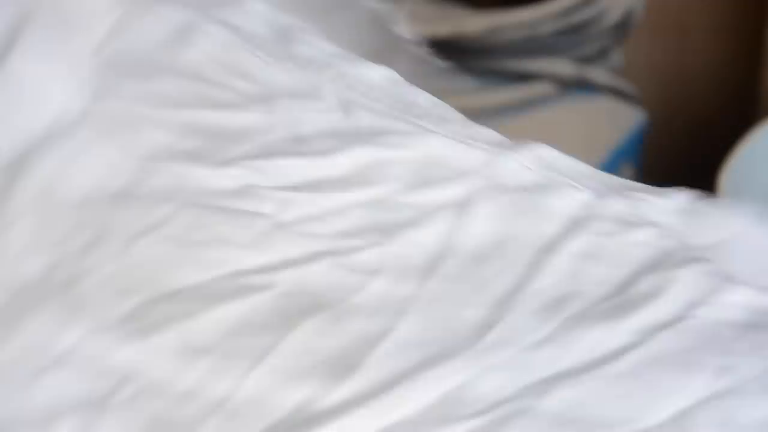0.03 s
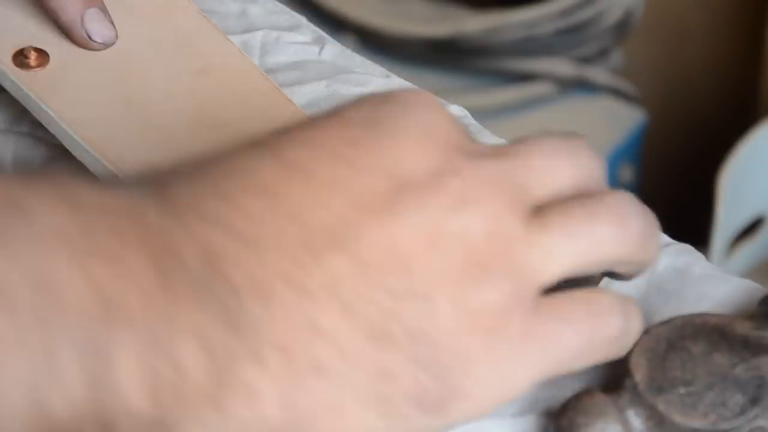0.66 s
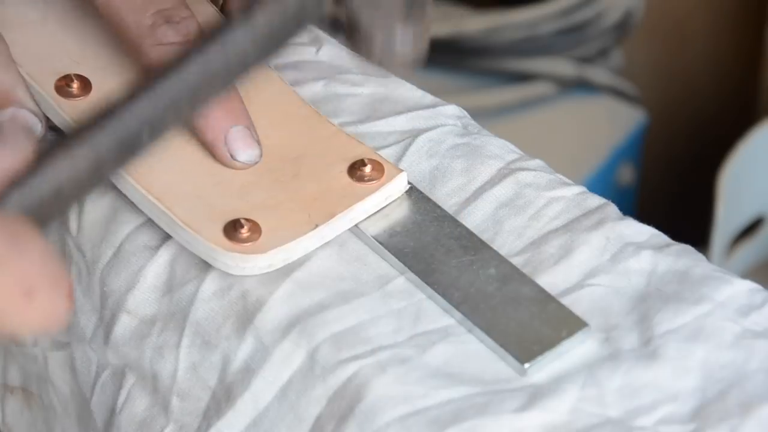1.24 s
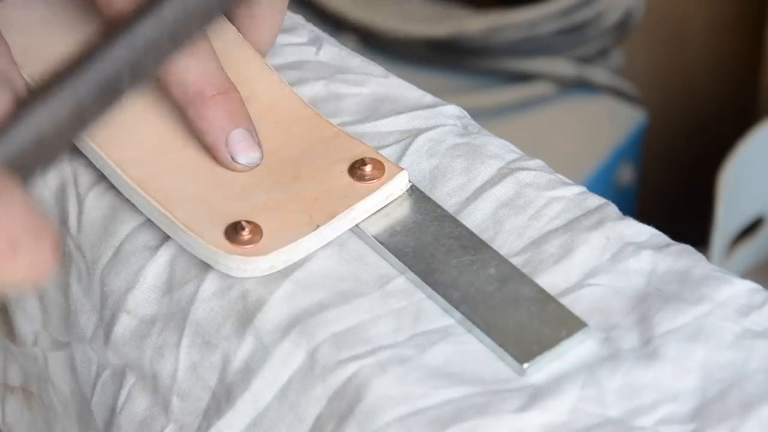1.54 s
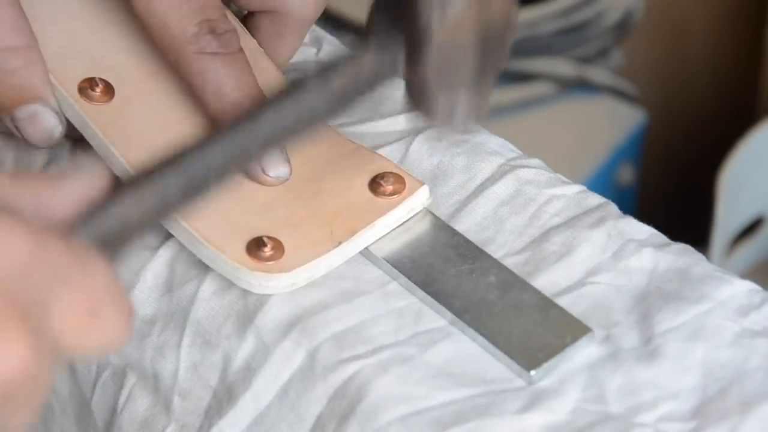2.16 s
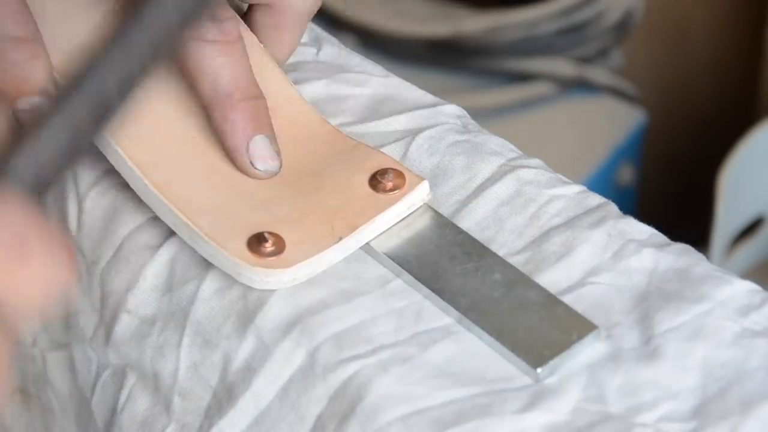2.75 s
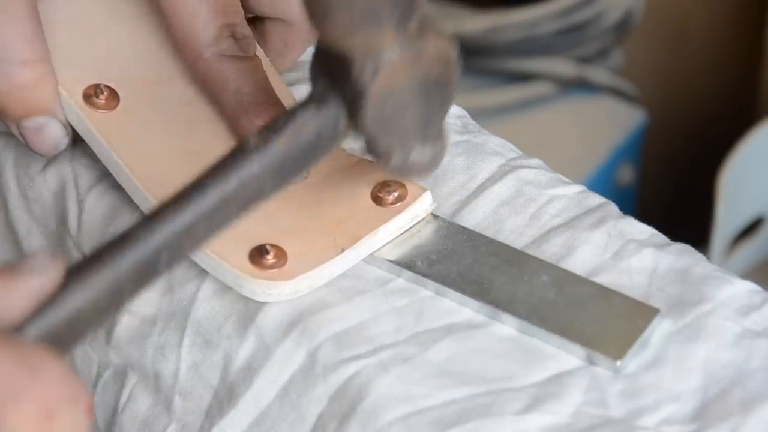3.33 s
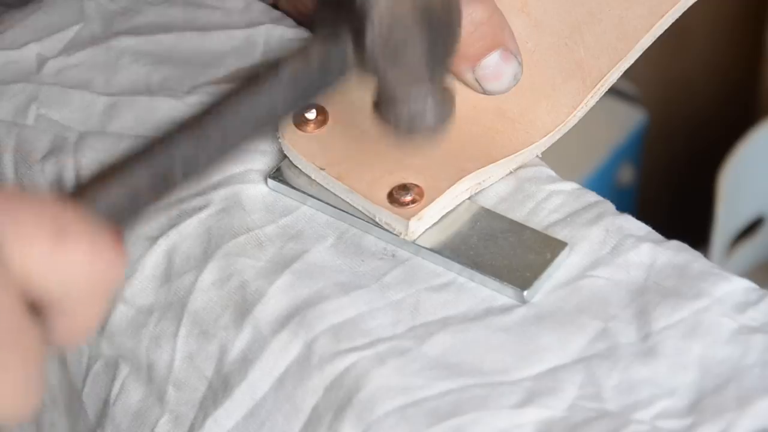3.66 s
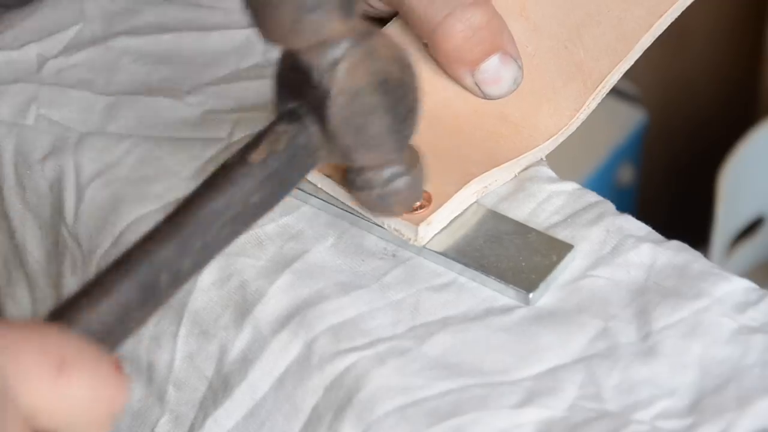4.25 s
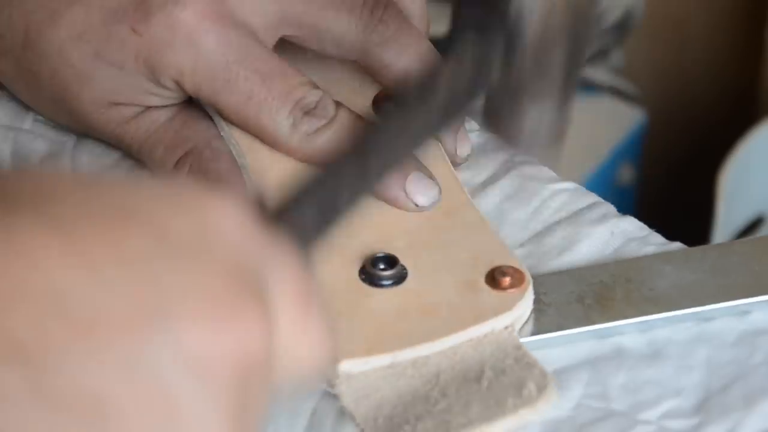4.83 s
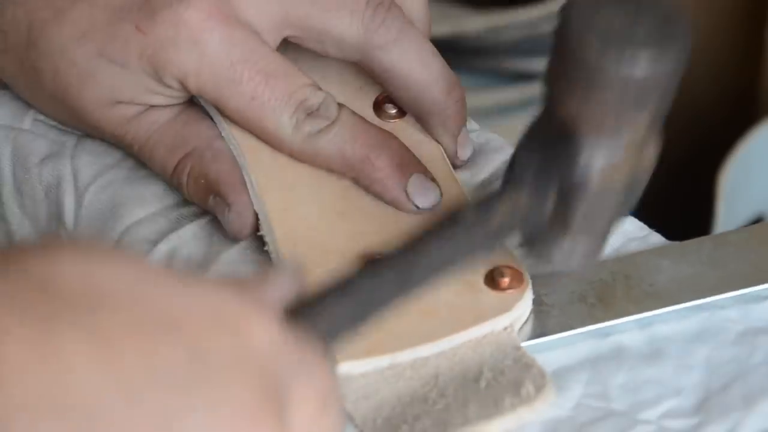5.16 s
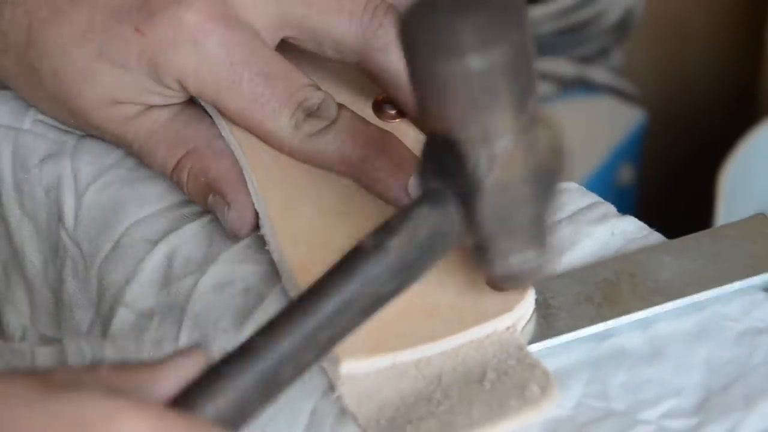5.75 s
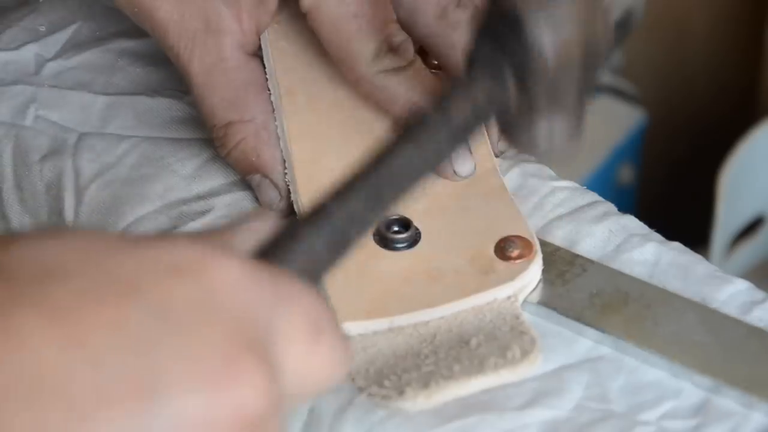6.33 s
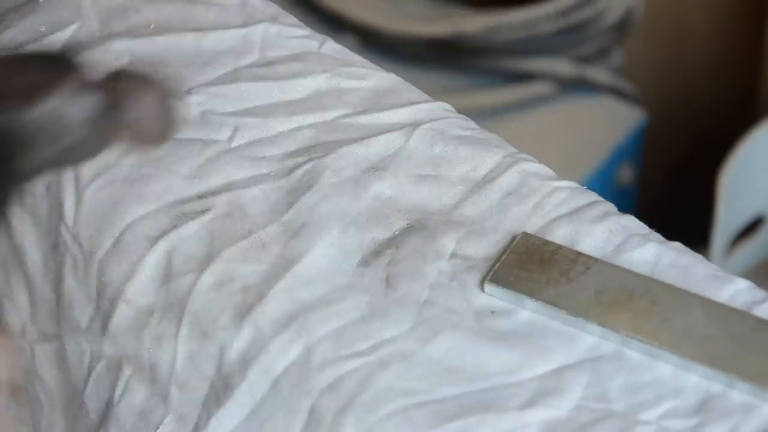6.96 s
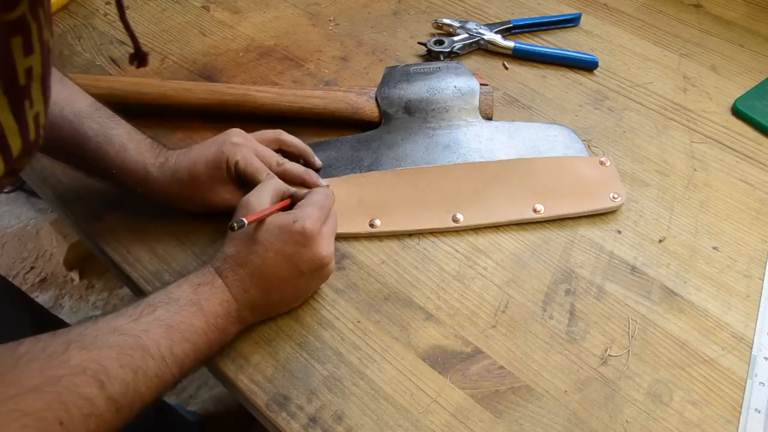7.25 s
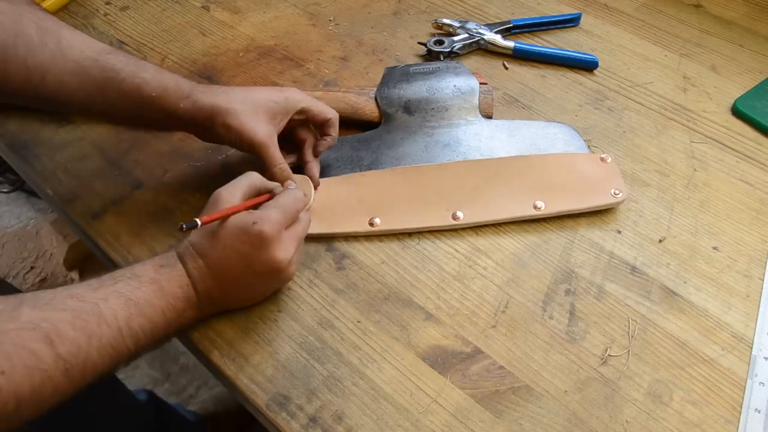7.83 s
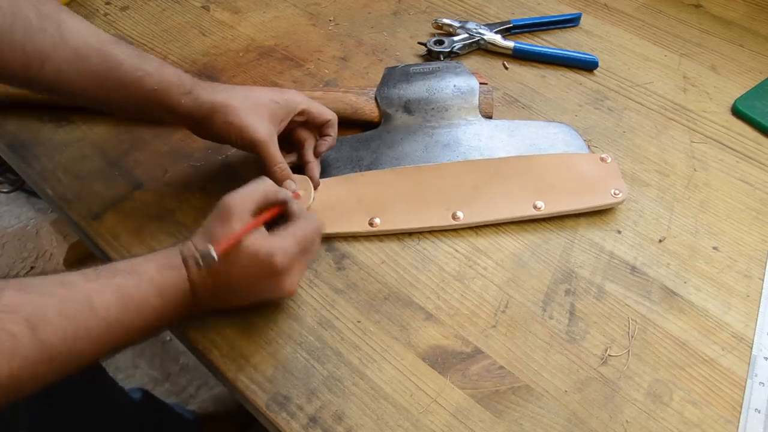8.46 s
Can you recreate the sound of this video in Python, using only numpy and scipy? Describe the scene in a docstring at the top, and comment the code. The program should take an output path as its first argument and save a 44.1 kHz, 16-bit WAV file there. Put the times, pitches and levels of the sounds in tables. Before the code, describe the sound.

In a quiet small workshop, cloth rustles and a steel bar clinks down and slides into place. A small hammer then taps rivets into a leather strap about seventy times in quick succession, each a sharp crack with a bench thud and a brief metal ring. The hammer is laid down with a clunk and a pencil stutters faintly across the leather. The microphone is close.

```python
"""A small hammer sets copper rivets in a leather strap on a steel bar: some seventy quick taps, each
a crack, a thud of the bench and a brief ring of metal, many blurred by a short rush just ahead.
One microphone stands close to the cloth-covered bench in a small workshop, over quiet air and hum.
First the bar clinks down and slides into place on the cloth; at the end the hammer is laid down
and a pencil stutters across the leather."""
import sys
import numpy as np
from scipy import signal
from scipy.fft import rfft, irfft
from scipy.io import wavfile

SR = 44100
rng = np.random.default_rng(int(sys.argv[2]) if len(sys.argv) > 2 else 0)


def file_out(sig):
    """Save sig as 16-bit WAV at sys.argv[1]."""
    # one column per channel
    cols = np.atleast_2d(sig).T
    # limit, then scale
    lim = np.clip(cols, -1, 1)
    pcm = np.round(lim * 32767).astype(np.int16)
    wavfile.write(sys.argv[1], SR, pcm)


N = 374850
TIME = np.arange(N) / SR
HIT_SAMPLES = 12288

# spectrum of the room air: frequency_hz, density_db
AIR_SPECTRUM = [(20, -14.5), (60, 1.5), (110, -6.5), (200, -6), (290, -2), (380, -8.5), (850, -7.5),
                (2000, -15.5), (4000, -20.5), (5600, -27), (6200, -26), (6800, -27), (9000, -31.5),
                (16000, -44)]
# loudness of the room air: time_s, level_db
AIR_LEVELS = [(0, -61.5), (7.28, -60), (7.3, -64), (8.5, -64)]
# electric hum and whine: pitch_hz, rms_db
HUM_TONES = [(61.5, -76), (102, -77), (150.5, -75), (301.3, -68.5), (15735, -80)]
# spectrum of rustling cloth and leather: frequency_hz, density_db
RUSTLE_SPECTRUM = [(100, -34), (500, 3), (1200, -4.5), (2500, -3), (5000, -2), (5700, -12), (7500, -7),
                   (10000, -7.5), (13000, -24), (16000, -39)]
# cloth and leather brushing: start_s, length_s, level_db, fade_db_per_s
BRUSH_STROKES = [(0, 0.017, -54, 200), (0.081, 0.23, -55, 52), (1.02, 0.11, -68.5, 36),
                 (6.858, 0.43, -61.5, 10), (7.728, .03, -64, 50), (7.827, 0.072, -61.5, 30)]
# short pushes of the bar over the cloth: start_s, length_s, level_db, from_hz, to_hz
BAR_PUSHES = [(0.64, .05, -63, 3400, 3750), (.65, 0.096, -63, 4500, 4800),
              (0.687, 0.059, -57.5, 2900, 2400), (0.71, .08, -59, 3400, 3530),
              (0.999, 0.069, -53.5, 4330, 4550), (1.04, 0.17, -63, 4440, 4250)]
# light knocks of fingers, strap and tools: start_s, level_db, pitch_hz, t60_s
LIGHT_KNOCKS = [(0.074, -46.5, 2520, 0.1), (1.118, -58, 4180, .08), (1.164, -43.5, 2390, 0.084),
                (1.167, -52, 7700, .06), (6.975, -49.5, 4020, 0.057), (7.095, -34.5, 242, 0.22),
                (7.151, -31.5, 2320, 0.025), (7.244, -38.5, 3950, 0.011), (7.786, -52, 170, 0.064)]
# the bar touches down on the strap's edge: start_s, level_db
BAR_TOUCHES = [(.5915, -29), (.594, -52), (.634, -32.5)]
# modes of the bar held in the fingers: pitch_hz, level_db, t60_s
HELD_BAR_MODES = [(330, -15.5, 0.044), (2400, -8.5, 0.018), (2860, -4.5, 0.047), (2730, -3, 0.074),
                  (5900, -25, 0.05)]
# the hammer is laid down and rocks: start_s, level_db
HAMMER_TOUCHES = [(7.0915, -21.5), (7.0985, -21.5), (7.111, -32)]
# modes of the lying hammer: pitch_hz, level_db, t60_s
LYING_HAMMER_MODES = [(264, -13, .11), (1230, -24, .12), (2342, 2, .1), (2480, 0, .05), (2640, -6, .05),
                      (2826, -9, .05), (4027, -3, .045), (5044, -5, .06)]
# resonances and hollows of bench, hammer and bar: centre_hz, width_hz, gain_db
BODY_RESONANCES = [(165, 20, -2.5), (187, 30, 3.5), (228, 25, -3), (262, 25, 1), (300, 25, -3),
                   (365, 50, 2), (470, 45, 4), (535, 30, -4), (590, 35, 4), (645, 60, -2), (720, 90, -5),
                   (885, 50, 3), (1000, 110, 3.5), (1421, 45, 6), (1631, 45, 5), (1903, 90, 5),
                   (2060, 45, 4), (2216, 45, 2), (2333, 40, 6.5), (2588, 60, 3), (2940, 130, 4.5),
                   (4300, 500, 1.5), (3400, 600, -2.5), (3585, 45, 5), (4742, 35, 7), (5150, 400, -2.5),
                   (5690, 240, -11), (6200, 500, 4), (6900, 200, -7), (7750, 300, 2), (8200, 2600, 4),
                   (10437, 35, 10), (12030, 140, 6), (13000, 2500, -2.5)]
# long, thin tones of the steel bar, their levels relative to the snap: pitch_hz, level_db, t60_s
BAR_TONES = [(4742, -3, .15), (5950, -11, .22), (7220, -7, .3), (9098, -8, .28), (10850, -19, .18),
             (11630, -13, .24)]
# the six noise bands of a usual blow (thud, knock, clack, ping, snap, fizz):
# low_hz, high_hz, tail_t60_s, crack_t60_s, crack_weight_db, level_db
BLOW_BANDS = [(140, 630, 0.15, 0.02, -1.5, -34.5), (694, 1452, 0.094, 0.013, 4.5, -36.5),
              (1700, 6010, 0.11, 0.009, 5.5, -27.5), (7370, 8050, 0.065, 0.0043, 9, -35),
              (5000, 9900, 0.11, 0.0077, 9.5, -36.5), (10660, 14000, .055, 0.0034, 11, -45)]
# a harder blow is brighter; each band's growth with strength: gain_db_per_db
BAND_GROWTH = [0.68, 1.2, 1.08, 0.92, 1.6, 1.4]
# each shift seats the strap differently on the bar, changing bench coupling, firmness and ring:
# start_s, thud_hz, bench_db, firmness_db, head_ring_db, bar_ring_db, best_ring_hz
STRAP_SEATS = [(1.2, 480, -1.5, -3.5, -26, -15, 7410), (1.62, 410, 0, 4, -13.5, -4, 6300),
               (2.0, 370.5, 0, -1.5, -26.5, -4, 6900), (2.87, 375, 1.5, 3, -20, -6.5, 6240),
               (3.68, 432, -1.5, -3, -23, -11.5, 8300), (4.65, 476, 0, 1.5, -15, -6, 9100),
               (5.99, 465, -1, 2.4, -18, -18.5, 9100), (6.68, 485, .5, 5, -8, -11.5, 8000)]
# hammer blows, all levels relative: start_s, strength_db, crack_db, rush_db, ping_db, clack_hz
HAMMER_BLOWS = [(1.2506, -41, 25.5, -7, -15, 2150), (1.3488, -41, 23.5, 8.5, -20, 1890),
                (1.4516, -36.5, 20, 4.5, -1, 1900), (1.5517, -37.5, 17.5, 8.5, -15, 2120),
                (1.6409, -34, 23, -5, 5, 2430), (1.7255, -39.5, 16, 9, 10.5, 2980),
                (1.7898, -35, 20, -4, 14, 2450), (1.853, -38.5, -8.5, -29, 4.5, 2860.0),
                (1.944, -39, 5, 15, 9.5, 2780), (2.0388, -33.5, 17, 1.0, 0.5, 3460),
                (2.115, -35.0, 1, -30.0, -21, 3420), (2.214, -32, 16.5, -4.5, -6, 3470),
                (2.3048, -35, 18, -0.5, -3, 3520), (2.3927, -33.5, 16.5, -4.5, -0.5, 3280),
                (2.4852, -34.5, 18, 1.5, 0.5, 3450), (2.579, -35.5, -5, 14, -12.5, 3340),
                (2.6609, -32.5, 16.5, -3.5, 3, 3560.0), (2.7464, -34, -1, -31, 0, 3220),
                (2.8454, -32, 18, -8, -2.5, 3380), (2.892, -38, 15.5, -7, -8, 2970),
                (2.9648, -36.5, 7.5, -27, -3, 2780.0), (3.0449, -35.5, 5, -42, -13, 2760),
                (3.1297, -37, -9, -35, -16, 2760), (3.2283, -38.5, 16.5, 13.0, -4, 2090.0),
                (3.31, -38, 15.5, 12, -15, 2800), (3.391, -35.0, 18.5, 1.5, -15.0, 2640),
                (3.479, -38, 16, 12, -2, 3030), (3.5529, -32.5, 20, -17, -14.5, 2700),
                (3.6337, -36, 14.5, -22, 4.5, 2750), (3.7236, -35, 17, 12.5, -5, 2150),
                (3.8038, -36, 16.5, 12, -10, 2060), (3.881, -32, 11, -57, -2.5, 2160),
                (3.9741, -31, 18.5, -5, -4.5, 2200.0), (4.0567, -31.5, 8.5, -34, 0.0, 2470.0),
                (4.1452, -30.5, 15, -35, 3, 2350), (4.2288, -34.5, 5.5, -30.0, -0.5, 2260),
                (4.3164, -34, 19.5, -1.0, -15, 1830), (4.3923, -33.0, 11, -16, 1.5, 2240),
                (4.4665, -33.0, 11, -42, 2, 2090), (4.541, -34.5, 17.5, -32.5, -7.5, 2020),
                (4.6802, -38.5, 20.5, 1.5, -3, 1570), (4.772, -36.0, 19.5, 10.5, 3.5, 2600),
                (4.8391, -35.0, 9, -34, 9, 2730), (4.914, -34.5, 15, -32, 0.5, 2260),
                (4.9968, -38.5, 17.5, 12, -13, 2530), (5.0714, -33.5, 21, 0.5, 7.5, 2500),
                (5.1428, -33, 15.5, -4.5, 5, 2500), (5.22, -36.0, 17.5, 4.5, -21, 2230),
                (5.293, -32, 18.5, -4.5, -2, 2480), (5.3703, -29.5, 21.5, -9.5, -1.5, 2580),
                (5.4516, -36.0, 17, 11.5, 3.5, 2550), (5.5188, -35.5, 11.5, -18, 5.5, 2600.0),
                (5.6007, -32, 23.5, -2.5, 3.5, 2160), (5.6778, -35.0, 13.5, -2, 3.5, 2300),
                (5.762, -37.5, 7, 14.5, 5, 2700), (5.8318, -35.5, 16.5, 9, -3.5, 2270.0),
                (5.9332, -30.5, 18, -7, -4, 2020), (5.963, -40.5, 24, -13.5, 1.5, 2520.0),
                (6.0219, -32, 18, -33, -4.5, 2860.0), (6.101, -37.0, 22, 7.5, -5.5, 2500),
                (6.1643, -31.5, 21, -10, -7, 2600), (6.232, -35.5, 18.5, -17, -14.0, 2600),
                (6.3045, -36, 21, -1, -1, 2600.0), (6.379, -38, 4, 18, -23, 2770),
                (6.4424, -34, 18.5, -2.5, -4, 2600), (6.509, -33, 19, -4.5, -8, 2570),
                (6.5733, -36, 21.5, -6, -21, 2700), (6.651, -42.0, 11.5, 19.5, -8.0, 2740.0),
                (6.7128, -30.5, 24, -6.5, -22, 2630), (6.7929, -34.5, 16.5, -1.5, -9, 2560)]


def from_db(db):
    """Decibels to gain."""
    return 10 ** (np.asarray(db) / 20)


def unit_rms(x):
    """Scale to an rms of 1."""
    return x / np.sqrt(np.mean(x ** 2) + 1e-20)


def add(out, start_s, sound):
    """Mix a sound in at start_s."""
    at = round(start_s * SR)
    out[at:at + len(sound)] += sound[:N - at]


def decay(t, t60):
    """Exponential decay from t = 0, silent before."""
    return (t >= 0) * from_db(-60 * np.maximum(t, 0) / t60)


def band(low_hz, high_hz, order=2):
    """Butterworth band-pass sections."""
    return signal.butter(order, [low_hz, high_hz], "band", fs=SR, output="sos")


def resonance(f, hz, width_hz, db):
    """Causal response of one resonance (db > 0) or hollow (db < 0), flat far from it."""
    detune, damping = hz ** 2 - f ** 2, 1j * f * width_hz
    return (detune + damping * from_db(max(db, 0))) / (detune + damping * from_db(max(-db, 0)))


def coloured_noise(spectrum):
    """Steady noise of a given spectrum, rms 1."""
    hz, db = np.transpose(spectrum)
    f = np.maximum(np.fft.rfftfreq(N, 1 / SR), 1)
    colour = from_db(np.interp(np.log(f), np.log(hz), db))
    return unit_rms(irfft(rfft(rng.standard_normal(N)) * colour, N))


def flutter(per_s, depth_db):
    """A gain that wanders at random."""
    knots = np.arange(0, TIME[-1] + 1, 1 / per_s)
    return from_db(depth_db * np.interp(TIME, knots, rng.standard_normal(len(knots))))


def room_tone():
    """The workshop behind the bench: quiet air and a steady electric hum."""
    hum = sum(from_db(db) * np.sqrt(2) * np.sin(2 * np.pi * (hz * TIME + rng.random()))
              for hz, db in HUM_TONES)
    air_db = np.interp(TIME, *np.transpose(AIR_LEVELS))
    return hum + from_db(air_db) * coloured_noise(AIR_SPECTRUM)


def cloth_rustle(attack_s=.015, release_t60=.12):
    """Cloth and leather brush in brief strokes of flickering noise."""
    strokes = 0
    for start_s, length_s, db, fade_db_per_s in BRUSH_STROKES:
        t = TIME - start_s
        attack = np.clip(1 + t / attack_s, 0, 1)
        level = from_db(db - fade_db_per_s * np.clip(t, 0, length_s))
        release = decay(np.maximum(t - length_s, 0), release_t60)
        strokes += attack * level * release
    return strokes * coloured_noise(RUSTLE_SPECTRUM) * flutter(per_s=83, depth_db=2.5)


def bar_slides(width_hz=150):
    """The bar slides over the weave with a breathy whistle that glides with its speed."""
    out = np.zeros(N)
    lowpass = signal.butter(2, width_hz, fs=SR, output="sos")
    for start_s, length_s, db, from_hz, to_hz in BAR_PUSHES:
        hz = np.linspace(from_hz, to_hz, round(length_s * SR))
        weave = unit_rms(signal.sosfilt(lowpass, rng.standard_normal(len(hz))))
        whistle = weave * np.sin(2 * np.pi * np.cumsum(hz) / SR)
        add(out, start_s, from_db(db) * np.hanning(len(hz)) * whistle)
    return out


def knocks_and_pencil(pencil_s=7.622, step_s=.0175, pencil_db=-51, pencil_hz=1490, pencil_t60=.048):
    """Damped contacts, each a noise burst around one pitch; the pencil stutters in an even run of six."""
    out, t = np.zeros(N), np.arange(HIT_SAMPLES) / SR
    pencil = [(pencil_s + k * step_s, pencil_db + rng.normal(0, 2), pencil_hz, pencil_t60)
              for k in range(6)]
    for start_s, db, hz, t60 in LIGHT_KNOCKS + pencil:
        burst = signal.sosfilt(band(hz / 1.65, hz * 1.3, order=1), rng.standard_normal(HIT_SAMPLES))
        add(out, start_s, from_db(db) * unit_rms(burst) * decay(t, t60))
    return signal.sosfilt(band(159.5, 7900), out + 1e-18)


def tool_set_down(touches, modes, scuff_db, scuff_t60):
    """Each touch rings a tool's modes over a short scuff; the cloth softens the contact."""
    out, t = np.zeros(N), np.arange(HIT_SAMPLES) / SR
    for start_s, level_db in touches:
        ring = 0
        for hz, db, t60 in modes:
            gain = from_db(db + rng.normal(0, 1))
            ring += gain * np.sin(2 * np.pi * (hz * t + rng.random())) * decay(t, t60)
        scuff = from_db(scuff_db) * rng.standard_normal(HIT_SAMPLES) * decay(t, scuff_t60)
        add(out, start_s, from_db(level_db) * (ring + scuff))
    return signal.sosfilt(band(190, 5400, order=6), out + 1e-18)


def steel_ring(t, bar_db, best_hz, head_db, head_hz=2338, head_t60=.25, loss_db_per_octave=16):
    """Bar and hammer head sing on after a blow; bar tones weaken with their distance from best_hz."""
    tones = [(hz, bar_db + db - loss_db_per_octave * abs(np.log2(hz / best_hz)), t60)
             for hz, db, t60 in BAR_TONES]
    tones.append((head_hz, head_db, head_t60))
    return sum(from_db(db + rng.normal(-1, 2.5)) * np.sin(2 * np.pi * hz * t) * decay(t, t60)
               for hz, db, t60 in tones)


def blow_envelope(t, crack_db, rush_db, tail_t60, crack_t60, echo_s=.0067, rush_s=.019):
    """A rush swells ahead of the crack; then come the echo off a near wall, the tail and the room."""
    swell_s = .0088 * max(from_db(rush_db), .25)   # a loud rush is nearly level, a faint one steep
    swell = np.exp((np.minimum(t, 0) + .0054) / swell_s)
    rush = from_db(rush_db) * swell * (t < 0) * (t > -rush_s)
    crack = from_db(crack_db) * decay(t, crack_t60)
    echo = from_db(11) * decay(t - echo_s, crack_t60)
    tail = from_db(12) * decay(t, tail_t60)
    room = from_db(-17) * decay(t, 1.3 * tail_t60)
    return np.sqrt(rush ** 2 + crack ** 2 + echo ** 2 + (tail + room) ** 2)


def contact_colours(f, thud_hz, clack_hz, crack_db, firm_db, give_hz=68):
    """Band responses: a sharp crack adds a deep thump; a firm seat makes the clack less pitched."""
    bench_give = from_db(-21.5 + .25 * crack_db) / (1 + 1j * f / give_hz) ** 2
    thud = resonance(f, thud_hz, width_hz=55, db=5)
    clack = resonance(f, clack_hz, width_hz=600, db=11 - .41 * firm_db)
    rivet = resonance(f, 7715, width_hz=70, db=17)
    return [thud, 1, clack, rivet, 1, 1], bench_give


def hammer_blows(usual_db=-35, hardness_db=6, dull_hz=5500, shared=.45, lead_s=.02, break_s=4.579):
    """Each blow shakes bench, rivet and bar, coloured by its strength and the seat of the strap."""
    out, t = np.zeros(N), np.arange(HIT_SAMPLES) / SR - lead_s
    f = np.fft.rfftfreq(HIT_SAMPLES, 1 / SR)
    body = np.prod([resonance(f, *mode) for mode in BODY_RESONANCES], axis=0) / (1 + 1j * f / dull_hz)
    colours = [body * signal.sosfreqz(band(low, high, order=4), f, fs=SR)[1]
               for low, high, *_ in BLOW_BANDS]
    reflections = rng.standard_normal((len(BLOW_BANDS), HIT_SAMPLES))   # common to all blows
    for start_s, strength_db, crack_db, rush_db, ping_db, clack_hz in HAMMER_BLOWS:
        seat = [row for row in STRAP_SEATS if row[0] <= start_s][-1]
        _, thud_hz, bench_db, firm_db, head_db, bar_db, best_hz = seat
        levels_db = np.array(BLOW_BANDS)[:, -1] + np.array(BAND_GROWTH) * (strength_db - usual_db)
        # a firm seat trades clack for snap and fizz
        levels_db += [bench_db, bench_db, -.41 * firm_db, ping_db, firm_db, firm_db]
        fresh = rng.standard_normal(reflections.shape)
        grain = np.sqrt(shared) * reflections + np.sqrt(1 - shared) * fresh
        contact, bench_give = contact_colours(f, thud_hz, clack_hz, crack_db, firm_db)
        blow = 0
        for k, (_, _, tail_t60, crack_t60, weight_db, _) in enumerate(BLOW_BANDS):
            envelope = blow_envelope(t, crack_db + weight_db + hardness_db, rush_db, tail_t60, crack_t60)
            response = colours[k] * contact[k] + bench_give * (k == 0)   # the give joins the thud
            part = irfft(rfft(grain[k] * envelope) * response)
            blow += from_db(levels_db[k]) * part / np.std(part[:round(.05 * SR)])   # level over 50 ms
        _, _, clack_db, _, snap_db, _ = levels_db
        blow += steel_ring(t, snap_db + bar_db, best_hz, clack_db + head_db)
        if start_s <= break_s:   # whatever still sounds at break_s stops dead
            blow *= start_s + t < break_s
        add(out, start_s - lead_s, blow)
    return out


def scene():
    """Hammer, tools, cloth and room at one microphone close to the bench."""
    blows = hammer_blows()
    bar_down = tool_set_down(BAR_TOUCHES, HELD_BAR_MODES, scuff_db=-24, scuff_t60=.13)
    hammer_down = tool_set_down(HAMMER_TOUCHES, LYING_HAMMER_MODES, scuff_db=-18, scuff_t60=.21)
    handling = knocks_and_pencil() + cloth_rustle() + bar_slides()
    return (blows + bar_down + hammer_down + handling + room_tone())[None]


def record(dry, ceiling=.37, cutoff_hz=16200):
    """The cracks overload the microphone input and are flattened; the highest treble is cut."""
    flattened = dry / (1 + (dry / ceiling) ** 4) ** (1 / 4)
    return signal.sosfiltfilt(signal.butter(14, cutoff_hz, fs=SR, output="sos"), flattened)


dry = scene()
out = record(dry)
file_out(out)
```